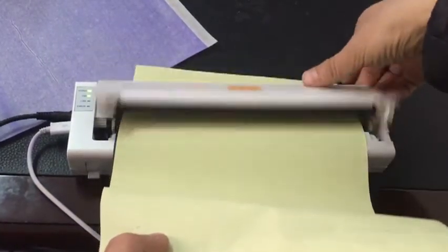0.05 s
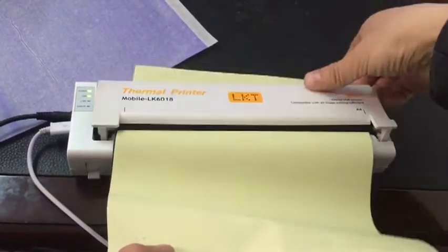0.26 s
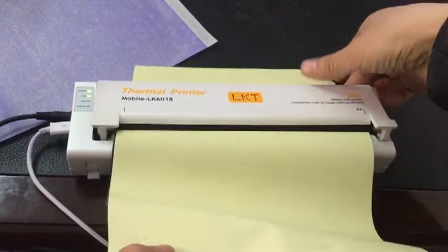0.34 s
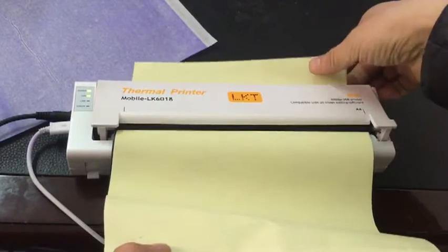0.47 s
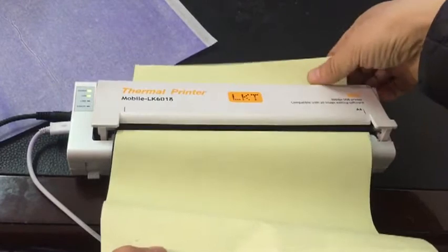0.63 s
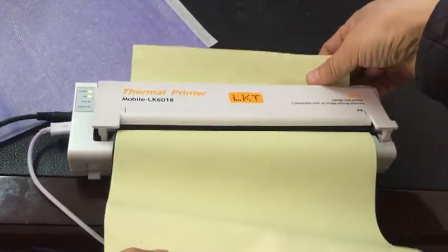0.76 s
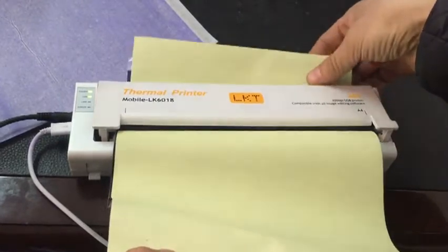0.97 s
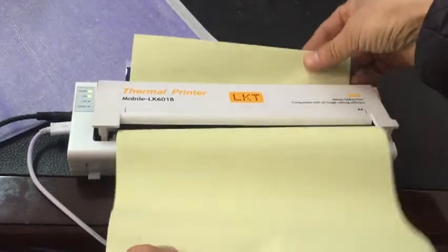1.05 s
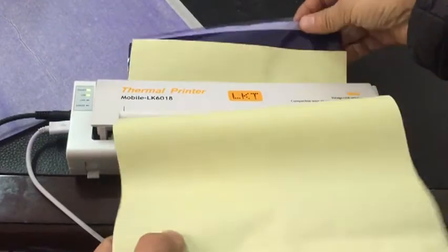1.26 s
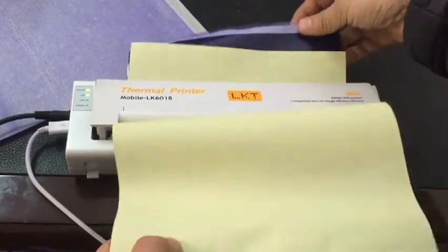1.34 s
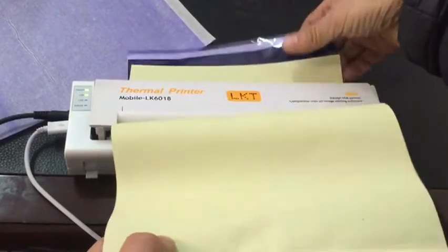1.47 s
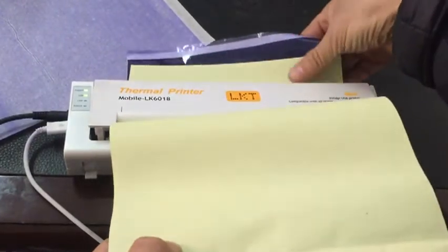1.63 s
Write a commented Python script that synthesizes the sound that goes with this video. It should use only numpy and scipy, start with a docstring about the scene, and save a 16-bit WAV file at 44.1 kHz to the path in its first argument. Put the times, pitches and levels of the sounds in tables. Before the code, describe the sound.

A plastic printer lid latches closed with a clack after a dull scrape. Paper crinkles as a hand handles it and softly bumps the desk, then a sheet slides away, hissing, in a small room with a faint rumble.

```python
"""Printer cover and paper

A small printer's plastic cover is pressed shut after a dull scrape: the latches snap, and the impact
excites the modes of case and desk. A hand bumps the desk and picks at the sheets, which crackle and
buckle, then pulls one away with a swelling friction hiss. A small room reverberates and rumbles."""
import sys
import numpy as np
from scipy import signal
from scipy.fft import rfft, irfft
from scipy.io import wavfile

SR = 44100
rng = np.random.default_rng(int(sys.argv[2]) if len(sys.argv) > 2 else 0)


def pcm_store(signal):
    """Save signal as 16-bit PCM."""
    levels = np.round(np.clip(np.atleast_2d(signal), -1, 1) * 32767)
    wavfile.write(sys.argv[1], SR, levels.astype(np.int16).T)


N = 74970
SHUT_S = 0.2365

# latch contacts: (time [s], relative crack level [dB], chatter t60 [s], treble tilt [dB/octave],
# knock frequency [Hz], knock level [dB])
LATCH_CONTACTS = [(0.2244, -14, 0.023, -3, 757, -16), (0.2322, -18.5, 0.016, 0.5, 1950, -20),
                  (0.2358, -8, 0.007, -4, 1721, -4), (0.2375, -3.5, 0.012, 0, 1116, -9),
                  (0.2392, -4, 0.026, -0.5, 1756, -11.5), (0.2420, -13.5, 0.023, 0, 1070, -12)]
# spectrum of the plastic's crack: (frequency [Hz], gain [dB])
CRACK_SPECTRUM = [(100, -16), (350, -3), (470, -12), (650, -3.5), (1100, 3.5), (1500, 3.5), (1850, 9.5),
                  (2250, -5), (2650, 0.5), (3100, -6.5), (4500, 1.5), (5200, -6.5), (5900, 2), (7000, -3.5),
                  (7700, -7), (9200, -7), (11500, -11), (15000, -15.5)]
def latches(crack_gain_db=17.5):
    """Impact excitation: each contact chatters in a broadband crack and rings one damped mode."""
    out = 0
    for s, db, t60, tilt, knock_hz, knock_db in LATCH_CONTACTS:
        crack = from_db(crack_gain_db + db) * colour(burst(t60), CRACK_SPECTRUM, tilt)
        knock = from_db(knock_db) * ring(s, knock_hz, t60=0.018, rise_s=0.00042)
        out += placed(s, crack) + knock
    return out


# modes of the plastic case: (frequency [Hz], relative level [dB], t60 [s])
CASE_MODES = [(561, -38, 0.28), (633, -30, .15), (766, -35, 0.17), (900, -35, .12), (976, -33, .25),
              (1052, -35, 0.34), (1283, -17.5, 0.08), (1350, -24.5, 0.11), (1675, -16, 0.094),
              (1910, -42, .1), (4560, -33, 0.11)]
def case(gain_db=2.5):
    """Modal superposition: the landing cover sets the case ringing in modes of alternating sign."""
    return sum((-1) ** k * from_db(gain_db + db) * ring(SHUT_S, hz, t60, rise_s=0.0027)
               for k, (hz, db, t60) in enumerate(CASE_MODES))


# low modes of desk and room: (frequency [Hz], level [dB], t60 [s], build-up [s])
DESK_MODES = [(67, -29.5, 0.32, 0.014), (99.4, -22.5, 0.81, .032), (111.4, -14.5, 0.21, 0.024),
              (141.8, -20.5, 0.27, 0.014), (200, -34, 0.81, 0.013), (226.5, -18.5, 0.207, 0.0079),
              (280, -29.5, 0.27, 0.004), (307, -33, 0.29, 0.0052)]
def desk_boom():
    """Free vibration: the low modes of desk and room build up and decay after the cover lands."""
    return sum(from_db(db) * ring(SHUT_S, hz, t60, rise_s) for hz, db, t60, rise_s in DESK_MODES)


# a dull scrape just before the cover snaps shut, then paper crackles: (time [s], relative level [dB],
# t60 [s], treble tilt [dB/octave], resonance [Hz], resonance boost [dB])
SCRAPE_AND_CRACKLES = [(0.171, -23.5, 0.09, -13.5, 990, 4.5), (0.412, -17.5, 0.072, -1, 3200, 1),
                       (0.431, -24, 0.022, 4.5, 5940, 4.5), (0.5081, -10.5, 0.018, 4.5, 3380, 6),
                       (0.511, -7.5, 0.019, 4, 610, 21), (0.518, -16, .025, 4, 4460, 8),
                       (0.5318, -18, 0.0084, 4, 8060, 12), (0.539, -11, 0.053, 3.5, 2450, 14),
                       (0.5461, -5.5, 0.0069, -1.5, 9000, 8), (0.547, -6.5, 0.0083, -0.5, 3300, 13),
                       (0.554, -12, .025, -2.5, 1760, 8), (0.559, -16.5, 0.025, -2.5, 1020, 15),
                       (0.731, -26, 0.01, 1.5, 2100, 3), (0.76, -11, 0.011, 0.5, 2080, 12.5),
                       (0.763, -10.5, 0.027, -4.5, 1110, 5), (0.7999, -10.5, 0.022, 1, 11300, 12),
                       (0.8864, -17.5, 0.014, -4.5, 900, 1), (0.980, -27.5, 0.027, -13, 1200, 8),
                       (1.15, -7, .04, 2, 1700, 10), (1.41, -11, 0.027, -4.5, 1710, 9.5),
                       (1.545, -21, 0.052, -9, 1186, 6)]
# their common spectrum: (frequency [Hz], gain [dB])
BURST_SPECTRUM = [(200, -33), (450, -16.5), (700, -8), (1100, 1.5), (1400, -0.5), (2100, 5), (3000, -3),
                  (5000, -3.5), (7500, -7.5), (11000, -10), (15000, -13.5)]
def scrape_and_crackles(gain_db=-0.5, resonance_q=7.6):
    """Resonant bursts: a dull scrape, then crackles that each ring in a bent patch of the paper."""
    out = 0
    for s, db, t60, tilt, hz, boost_db in SCRAPE_AND_CRACKLES:
        noise = colour(burst(t60), BURST_SPECTRUM, tilt)
        resonance = signal.lfilter(*signal.iirpeak(hz, resonance_q, fs=SR), noise)
        boosted = noise + (from_db(boost_db) - 1) * resonance
        out += placed(s, from_db(gain_db + db) * boosted)
    return out


# buckles of the sheet: (time [s], tone level [dB], frequency [Hz], t60 [s], snap level [dB])
BUCKLES = [(0.886, -35.5, 633, 0.029, -28), (1.02, -28.5, 1640, 0.043, -31),
           (1.0233, -26.5, 820, 0.0087, -25), (1.0267, -11, 1560, 0.0035, -19),
           (1.0483, -9, 1683, 0.0075, -1.5), (1.466, -37.5, 650, 0.056, -17)]
# spectrum of the snap: (frequency [Hz], gain [dB])
SNAP_SPECTRUM = [(300, -16), (900, -1), (2500, 10), (4200, -29), (5500, -0.5), (6600, -22), (7600, -25),
                 (15000, -22)]
def flicks():
    """Snap-through buckling: the sheet pops over with a brief hollow tone and a small snap."""
    out = 0
    for s, db, hz, t60, snap_db in BUCKLES:
        tone = from_db(db) * ring(s, hz, t60, rise_s=0.00054)
        snap = from_db(snap_db) * colour(burst(t60=0.0013), SNAP_SPECTRUM)
        out += tone + placed(s, snap)
    return out


# hiss following the sheet's speed, one list per stroke: (time [s], level [dB])
SLIDE_STROKES = [
    [(0.50, -70), (0.545, -46), (0.585, -45.5), (0.63, -67), (0.68, -73)],
    [(1.085, -58.5), (1.103, -39.5), (1.145, -38.5), (1.165, -35.5), (1.23, -34.5), (1.292, -29.5),
     (1.33, -31), (1.36, -35.5), (1.408, -36.5), (1.425, -60), (1.49, -85)],
    [(1.655, -81), (1.67, -53.5), (1.70, -58.5)],
]
# spectrum of the hiss: (frequency [Hz], relative level [dB])
HISS_SPECTRUM = [(300, -49), (800, -32), (1200, -7.5), (2200, 1.5), (3300, -2.5), (4500, -1), (5400, 1),
                 (6600, -4.5), (7600, -12), (9200, -3.5), (10400, -8), (12000, -6), (15000, -9.5)]
# broad band in which the sheet sings: (frequency [Hz], relative level [dB])
SING_SPECTRUM = [(2500, -42), (4600, -12), (5400, -3), (6400, -3), (7400, -9.5), (10000, -26)]
def sliding_sheet(judder_db=0.76, sing_db=-33, sing_exponent=2.4):
    """Friction noise grows with speed: the pulled sheet hisses, and sings when it moves fastest."""
    speed = sum(envelope(stroke) for stroke in SLIDE_STROKES)
    hiss = speed * friction(HISS_SPECTRUM, judder_db)
    sing_gain = from_db(sing_db) * (speed / speed.max()) ** sing_exponent
    return hiss + sing_gain * friction(SING_SPECTRUM, judder_db)


# course of the rubbing: (time [s], level [dB])
RUB_LEVELS = [(0, -59.5), (0.06, -60.5), (0.16, -60.5), (0.174, -47.5), (0.215, -47.5), (0.26, -50),
              (0.48, -63.5), (0.54, -44.5), (0.56, -48), (0.62, -44.5), (0.65, -58), (0.71, -59.5),
              (0.75, -48.5), (0.795, -50), (0.812, -43.5), (0.935, -47), (1.005, -55.5), (1.06, -44.5),
              (1.09, -50.5), (1.16, -39), (1.40, -48.5), (1.43, -57.5), (1.47, -48.5), (1.525, -61.5),
              (1.57, -49), (1.608, -44), (1.65, -60.5), (1.70, -91)]
# spectrum of the rubbing: (frequency [Hz], relative level [dB])
RUB_SPECTRUM = [(150, -26), (450, -19.5), (620, -6), (900, -4), (1250, -1.5), (1850, 6.5), (2800, -7),
                (4500, -6), (6500, -9), (7700, -15.5), (10500, -15), (15000, -19)]
def rubbing():
    """Uneven sliding friction: the handled sheets rub dully on each other and on the case."""
    return envelope(RUB_LEVELS) * friction(RUB_SPECTRUM, judder_db=2.5)


# bumps on printer and desk: (time [s], level [dB], frequency [Hz], t60 [s])
HAND_BUMPS = [(0.167, -33.5, 145, 0.75), (0.361, -31.5, 252.5, 0.1), (0.42, -29.5, 148.7, 0.21),
              (0.795, -33.5, 223, 0.1), (0.871, -44.5, 147, 0.11), (0.955, -38, 142, 0.17),
              (1.086, -42, 64.4, 0.26), (1.179, -37.5, 85, 0.27)]
def hand_bumps():
    """Soft impact: each touch of a hand excites a single low mode."""
    return sum(from_db(db) * ring(s, hz, t60, rise_s=0.0066) for s, db, hz, t60 in HAND_BUMPS)


# spectrum of the reverberation: (frequency [Hz], gain [dB])
ROOM_SPECTRUM = [(80, 1), (250, 3), (350, -5.5), (460, 3), (600, -6.5), (1000, -14), (2000, -10.5),
                 (5000, -14), (14000, -11.5)]
# reverberation time: (frequency [Hz], t60 [s])
ROOM_DECAY = [(100, 0.72), (500, 0.39), (1800, 0.32), (5000, 0.19), (14000, 0.16)]
def room(x, delay_s=0.005):
    """Diffuse reverberation: each octave decays exponentially, the treble fastest."""
    response, edges_hz = 0, np.geomspace(60, 16000, 9)
    for low, high in zip(edges_hz, edges_hz[1:]):
        t60 = at_hz(ROOM_DECAY, np.sqrt(low * high))
        tail = rng.standard_normal(N // 2) * decay(t60, N // 2)
        octave = signal.butter(2, [low, high], "band", fs=SR, output="sos")
        response += signal.sosfilt(octave, tail / np.linalg.norm(tail))
    return signal.fftconvolve(x, placed(delay_s, colour(response, ROOM_SPECTRUM)))[:N]


# spectral density of the room's rumble: (frequency [Hz], relative level [dB])
RUMBLE_SPECTRUM = [(25, -12), (45, -6), (65, -7), (105, 1), (160, -0.5), (198, 1), (260, -12.5), (350, -9),
                   (450, -24.5), (700, -22.5), (1700, -18.5), (3000, -43.5), (8000, -47.5), (15000, -58)]
def rumble(rms_db=-49):
    """Stationary noise: the room's background has most of its power at low frequencies."""
    hz = np.arange(N // 2 + 1) * SR / N
    spectrum = rfft(rng.standard_normal(N)) * from_db(at_hz(RUMBLE_SPECTRUM, hz))
    return from_db(rms_db) * unit_rms(irfft(spectrum, N))


def friction(spectrum, judder_db, fibres_per_s=5000, fibre_share=0.34, judder_hz=71):
    """Shot noise of catching fibres over a smooth hiss, modulated by an uneven stroke; unit rms."""
    fibres = unit_rms(rng.choice([-1, 1], N) * (rng.random(N) < fibres_per_s / SR))
    noise = np.sqrt(fibre_share) * fibres + np.sqrt(1 - fibre_share) * rng.standard_normal(N)
    lowpass = signal.butter(2, judder_hz, fs=SR, output="sos")
    judder = unit_rms(signal.sosfilt(lowpass, rng.standard_normal(N)))
    return unit_rms(colour(noise * from_db(judder_db * judder), spectrum))


def ring(s, hz, t60, rise_s):
    """Damped oscillator: one mode builds up from time s and dies away."""
    age = np.arange(int(min(2 * t60 * SR, N))) / SR
    build_up = (1 - np.exp(-2 * age / rise_s)) ** 2
    return placed(s, np.sin(2 * np.pi * hz * age) * decay(t60, len(age)) * build_up)


def burst(t60, size=4096):
    """Contact chatter: a dying run of tiny impacts with an even spectrum and unit energy."""
    spectrum = rfft(rng.standard_normal(size) * decay(t60, size))
    chatter = irfft(spectrum / (abs(spectrum) + 1e-12)) * decay(4 * t60, size)
    return chatter / np.linalg.norm(chatter)


def colour(x, spectrum, tilt_db=0, size=4096):
    """Minimum-phase filter with the given spectrum, tilted by tilt_db per octave about 3 kHz."""
    hz = np.arange(size // 2 + 1) * SR / size
    octaves = np.log2(np.clip(hz, 1000, 16000) / 3000)
    cepstrum = irfft(np.log(from_db(at_hz(spectrum, hz) + tilt_db * octaves)))
    cepstrum[1:size // 2] *= 2  # folding the cepstrum makes the filter causal
    cepstrum[size // 2 + 1:] = 0
    response = irfft(np.exp(rfft(cepstrum)))
    return signal.oaconvolve(x, response)[:len(x)]


def envelope(points, hold_s=0.03):
    """Gain through (time [s], level [dB]) points, held briefly at each end and silent beyond."""
    s, db = np.transpose(points)
    t = np.arange(N) / SR
    sounding = (t >= s[0] - hold_s) & (t <= s[-1] + hold_s)
    return from_db(np.interp(t, s, db)) * sounding


def decay(t60, size):
    """Exponential decay by 60 dB every t60 seconds."""
    return np.exp(-np.log(1000) * np.minimum(np.arange(size) / SR / t60, 10))


def at_hz(points, hz):
    """Interpolation on a log-frequency axis."""
    frequencies, values = np.transpose(points)
    return np.interp(np.log(np.maximum(hz, 1)), np.log(frequencies), values)


def placed(s, x):
    """Delay by s seconds within the scene's length."""
    return np.pad(x, (int(s * SR), N))[:N]


def from_db(db):
    return 10 ** (np.asarray(db) / 20)


def unit_rms(x):
    return x / np.sqrt(np.mean(x ** 2) + 1e-20)


def scene():
    """Superposition of direct and diffuse sound; the latches radiate differently to three sides."""
    handling = scrape_and_crackles() + flicks() + rubbing() + sliding_sheet()
    front, left, right = latches(), latches(), latches()
    share = 1 / np.sqrt(3)  # incoherent sides add in power
    reverberation = room(handling + share * front) + share * (room(left) + room(right))
    return (front + case() + desk_boom() + handling + hand_bumps() + reverberation + rumble())[None]


def record(dry, ceiling=0.9, cutoff_hz=15250):
    """Soft saturation rounds the peaks, and a steep low-pass limits the bandwidth."""
    hz = np.arange(N // 2 + 1) * SR / N
    rounded = ceiling * np.tanh(dry / ceiling)
    return irfft(rfft(rounded) / np.sqrt(1 + (hz / cutoff_hz) ** 400), N)


dry = scene()
out = record(dry)
pcm_store(out)
```